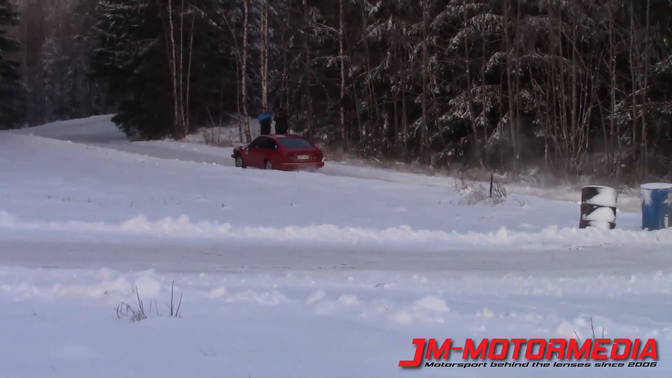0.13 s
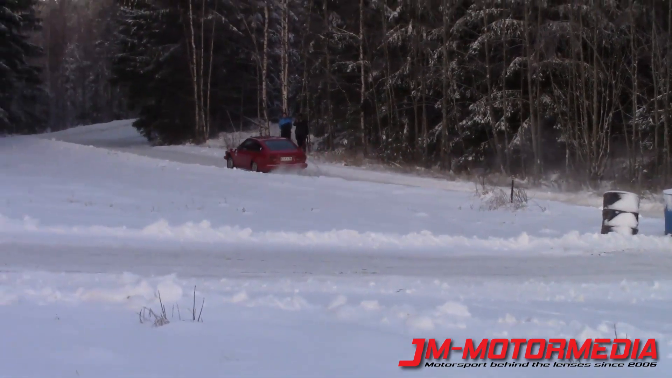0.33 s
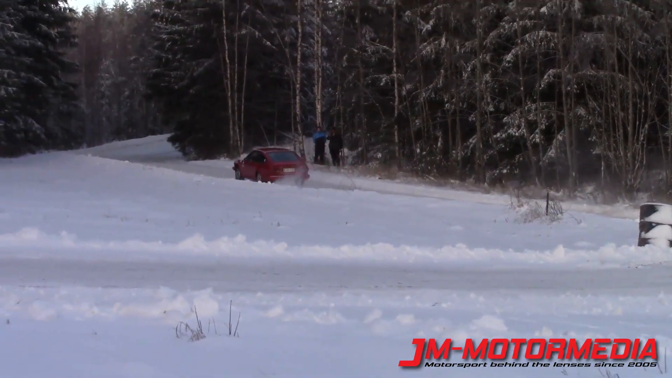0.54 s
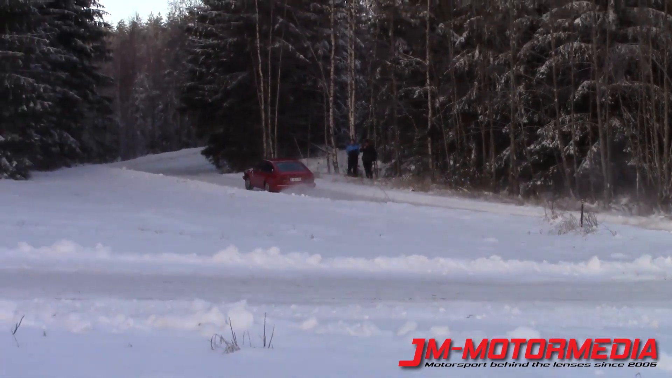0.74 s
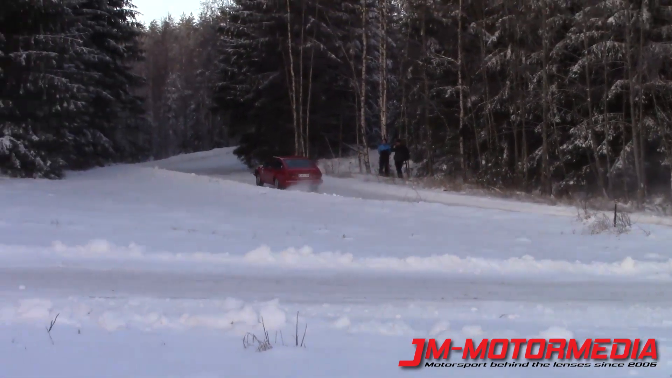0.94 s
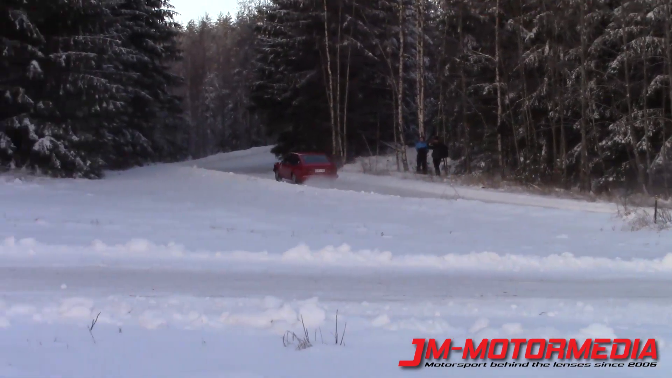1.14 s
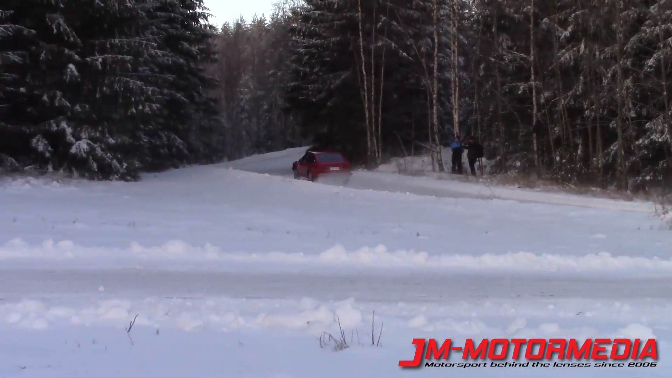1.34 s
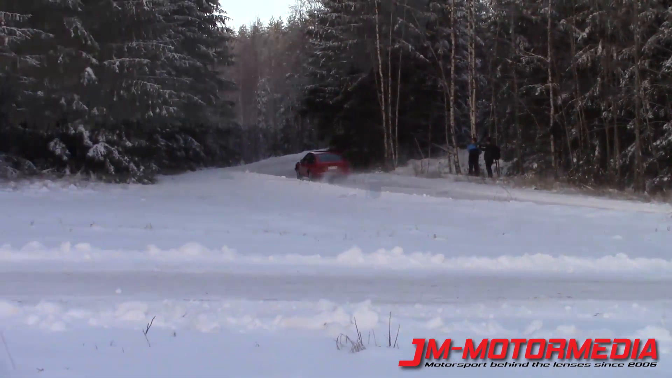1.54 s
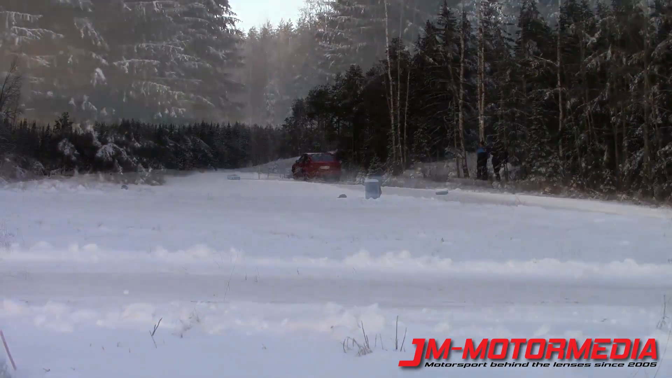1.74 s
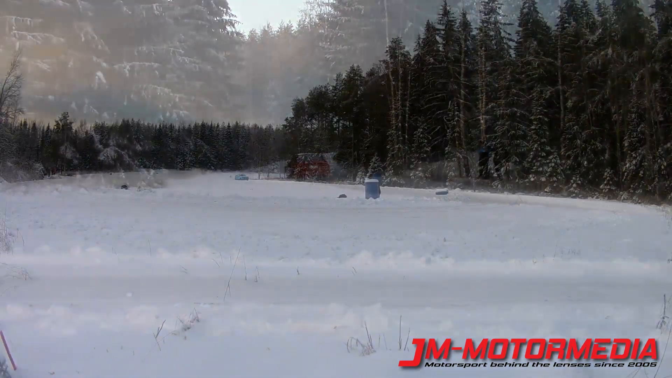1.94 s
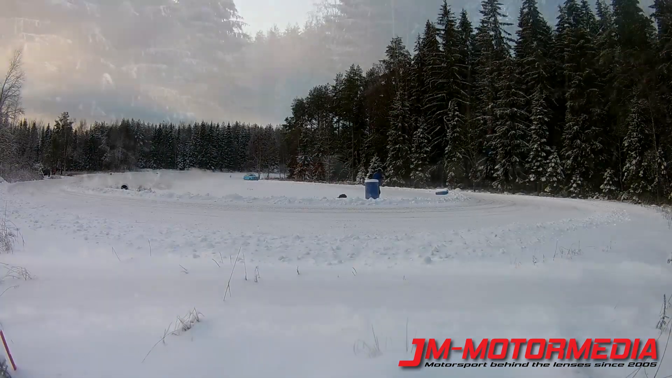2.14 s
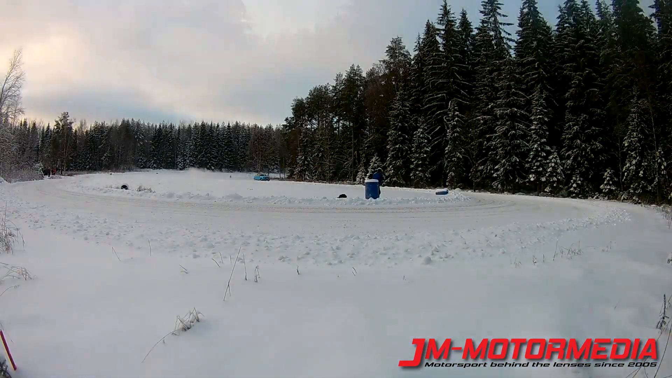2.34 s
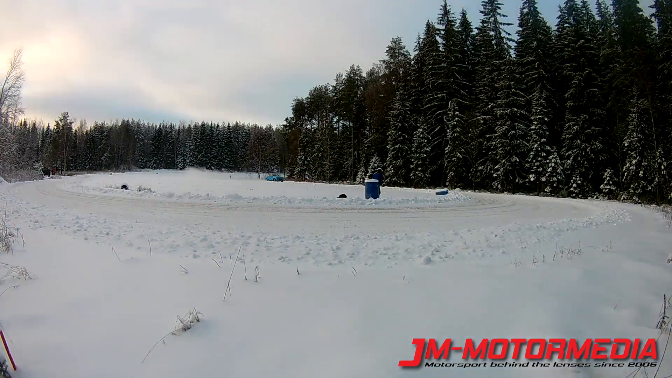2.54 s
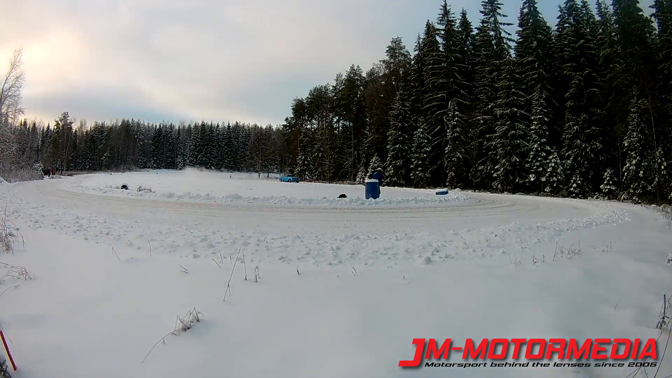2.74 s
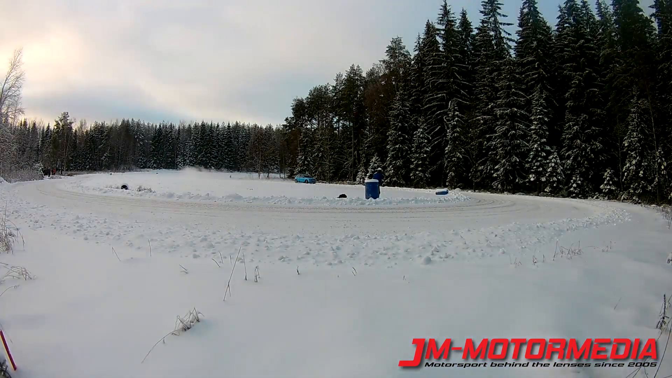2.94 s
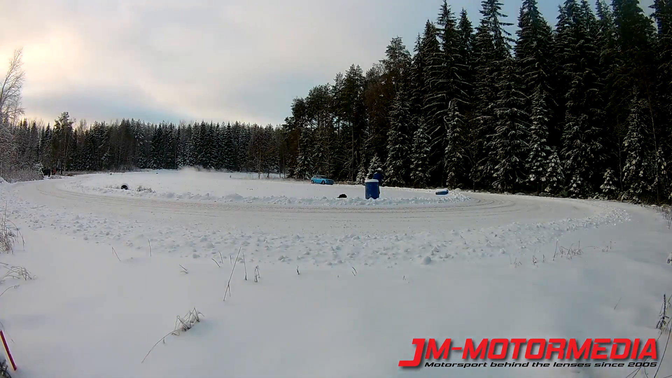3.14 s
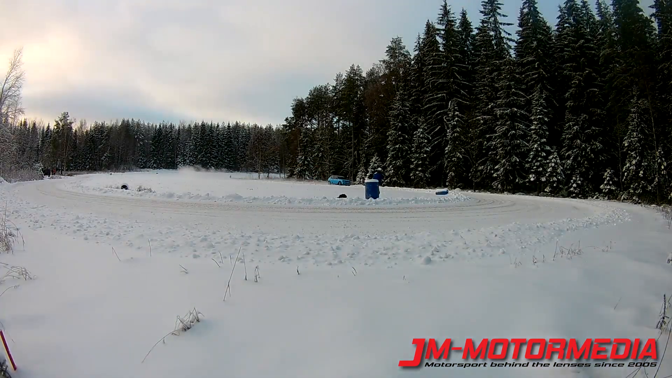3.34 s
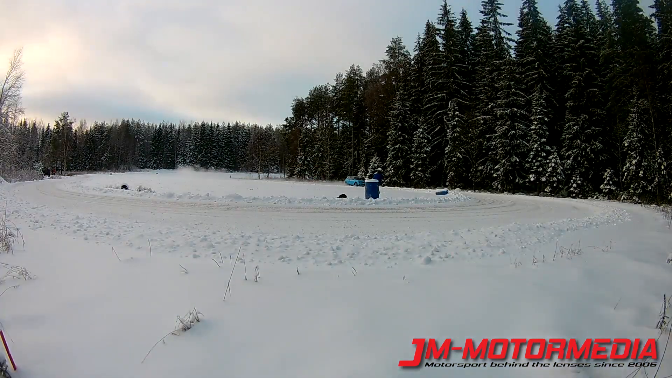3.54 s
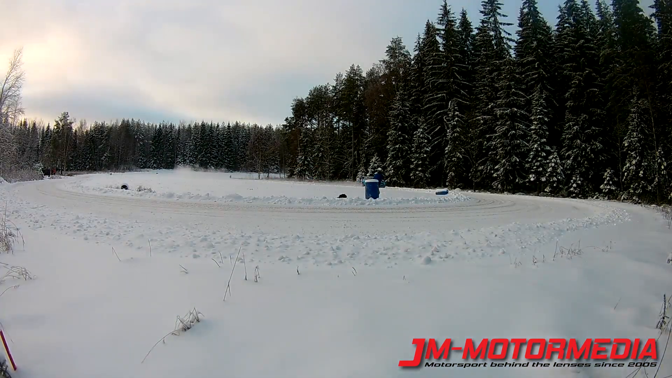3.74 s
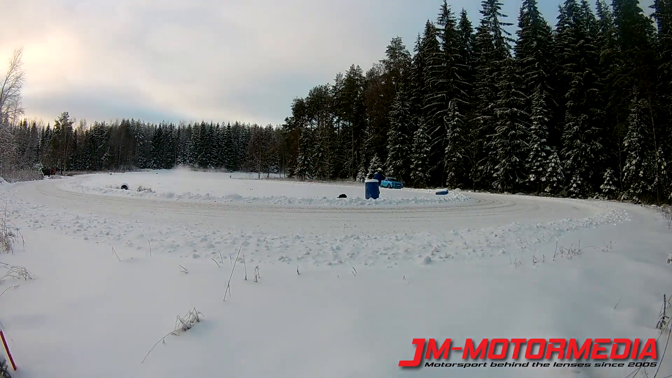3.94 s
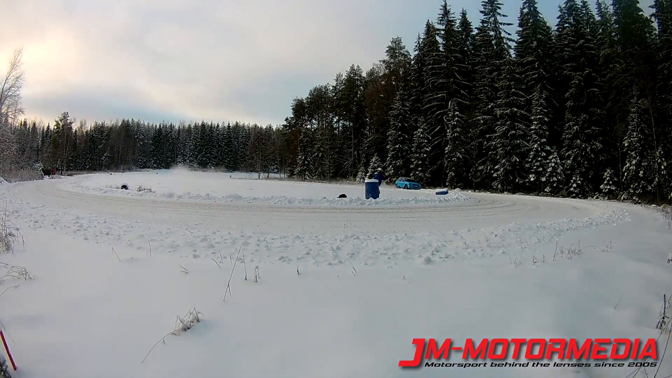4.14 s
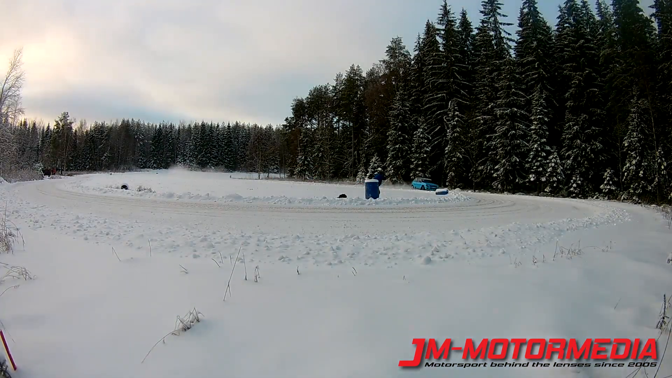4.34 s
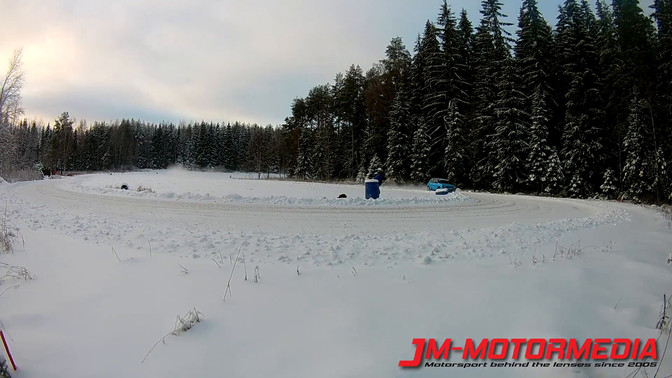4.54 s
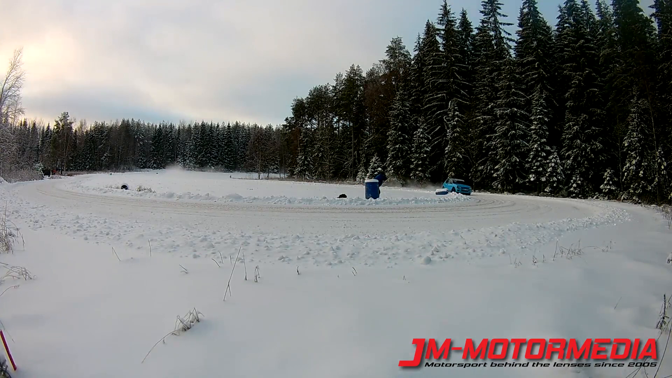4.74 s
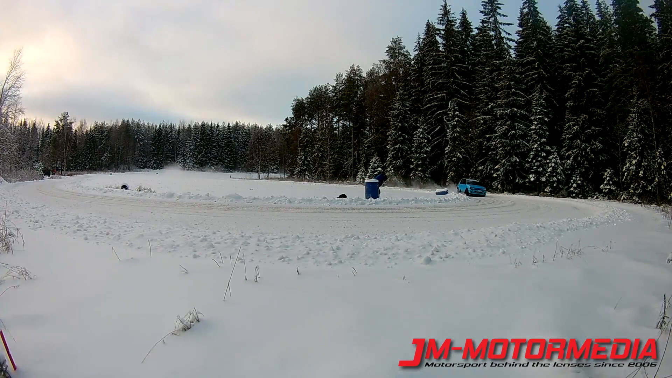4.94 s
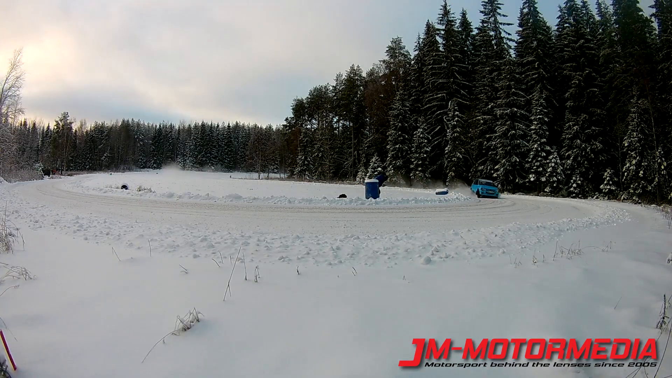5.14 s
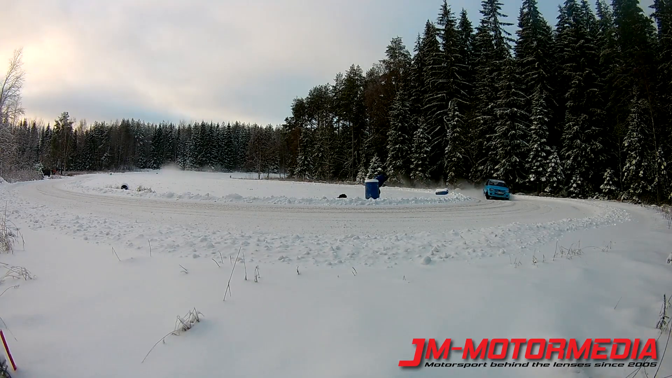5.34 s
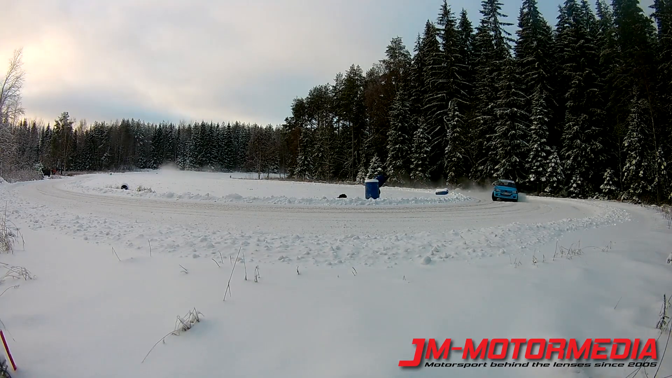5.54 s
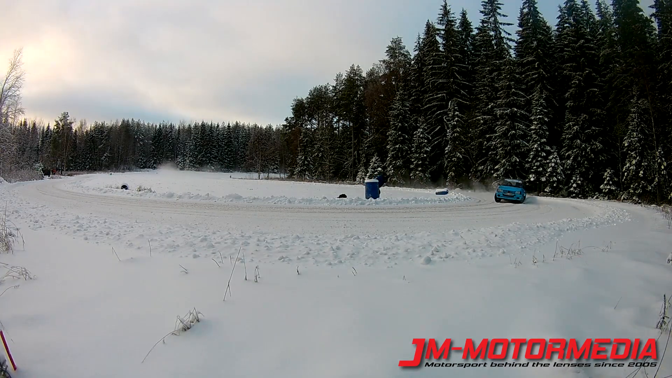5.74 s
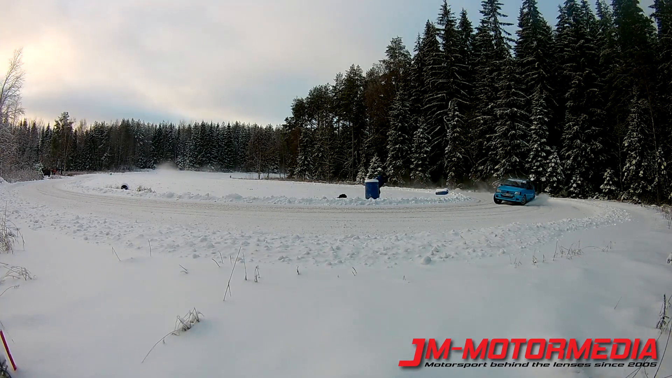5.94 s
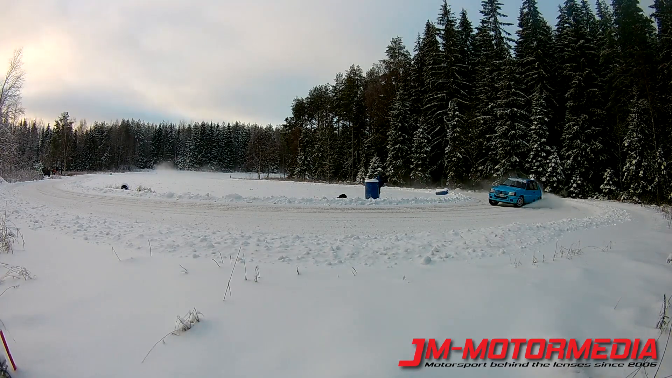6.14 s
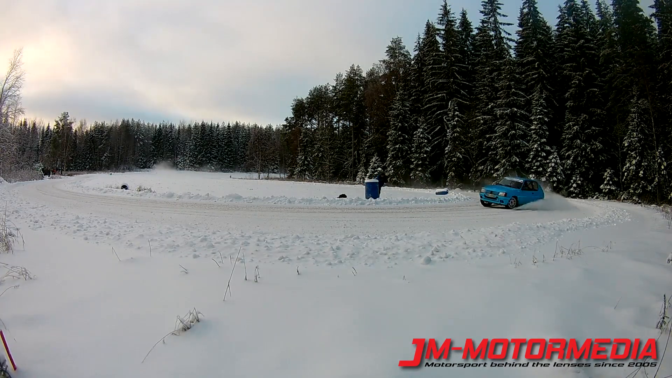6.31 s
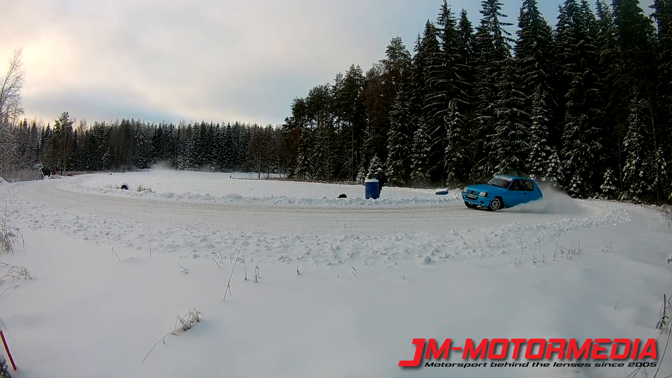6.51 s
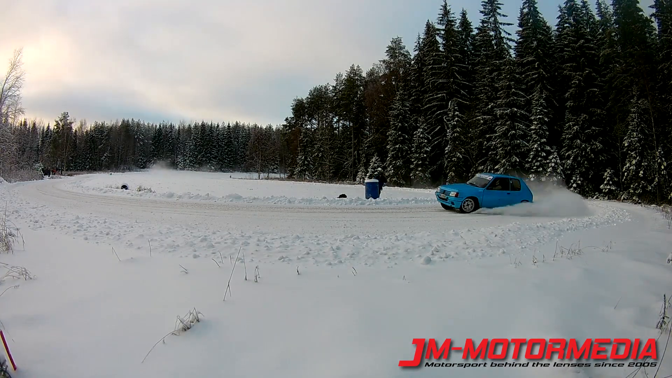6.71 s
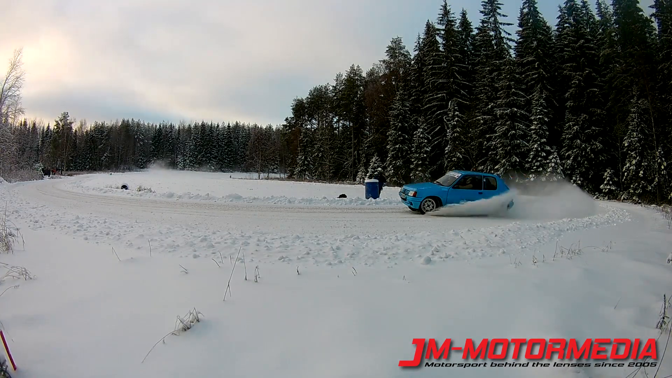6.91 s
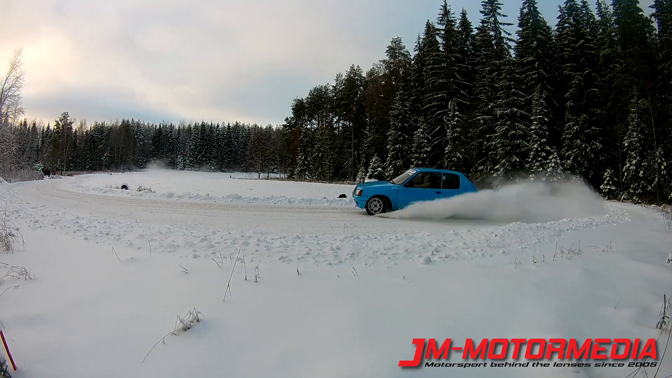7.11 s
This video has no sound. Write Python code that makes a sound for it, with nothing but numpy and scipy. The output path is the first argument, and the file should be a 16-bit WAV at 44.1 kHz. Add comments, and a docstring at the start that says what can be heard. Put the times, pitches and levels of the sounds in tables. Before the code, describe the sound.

Two rally cars outdoors in winter. The first, heard openly, drives off with full exhaust roar and rasp, its pitch rising slightly before the throttle closes. The sound switches abruptly to a dull enclosed microphone with gusty low rumble and a small far engine. That engine booms briefly, sags in pitch, picks up again and surges near, buzzing and rough, with soft hissing snow.

```python
"""Two rally cars on a snowy forest track, joined by a hard cut at about two seconds.
First, at an open microphone, a car pulls away and lifts off: engine orders under exhaust roar, rasp and hiss.
Then a boxed-in microphone hears another car from afar, over wind rumble and faint self-noise. It lifts
off for a bend, a short boom sounding just before, and charges near: its orders, uneven firings and roar
swell along with the noise of thrown snow."""
import sys
import numpy as np
from scipy import signal
from scipy.fft import rfft, irfft, next_fast_len
from scipy.io import wavfile
from scipy.ndimage import uniform_filter1d

SR = 44100
rng = np.random.default_rng(int(sys.argv[2]) if len(sys.argv) > 2 else 0)


def transcribe(u):
    """Save the signal u as a 16-bit wav file named by the first command-line argument.

    u: samples, shape (n,) or (channels, n), limited to [-1, 1]; the rate is SR.
    q: integer samples, one column per channel.
    """
    v = np.clip(np.atleast_2d(u).T, -1, 1)
    q = np.round(v * 32767).astype(np.int16)
    wavfile.write(sys.argv[1], SR, q)


N = 320607
T = np.arange(N) / SR   # time axis in s


def amp(db):
    """Turn dB into linear gain."""
    return 10 ** (np.asarray(db) / 20)


def rms_one(x):
    """Scale to rms 1."""
    return x / np.sqrt(np.mean(x ** 2) + 1e-20)


def in_time(rows):
    """Draw each column of a (t/s, value, ...) table as a curve, one value a sample."""
    times, *columns = np.transpose(rows)
    return [np.interp(T, times, column) for column in columns]


def at_hz(points, hz):
    """Read the dB of a spectrum at given frequencies, along a log frequency axis."""
    points_hz, points_db = np.array(points).T
    return np.interp(np.log(hz), np.log(points_hz), points_db)


def drift(rate):
    """Slow random modulation of rms 1: noise low-passed at about `rate` Hz."""
    step = 40   # samples between control values
    knots = rng.standard_normal(N // step + 1)
    lowpass = signal.butter(1, min(rate, 400), fs=SR / step, output="sos")
    slow = rms_one(signal.sosfiltfilt(lowpass, knots))
    return np.interp(np.arange(N) / step, np.arange(len(slow)), slow)


def colour(x, spectrum):
    """Filter by a spectrum, dark outside its ends, and scale to rms 1."""
    size = next_fast_len(N)
    hz = np.fft.rfftfreq(size, 1 / SR) + 1e-3   # the offset keeps log(0) away
    points_hz, points_db = np.array(spectrum).T
    gain_db = np.interp(np.log(hz), np.log(points_hz), points_db, left=-120, right=-120)
    return rms_one(irfft(rfft(x, size) * amp(gain_db), size)[:N])


def hiss(spectrum, patchy_db, rate):
    """Coloured noise whose level flickers at random by `patchy_db` rms."""
    flicker = amp(patchy_db * drift(rate))
    return colour(rng.standard_normal(N) * flicker, spectrum)


def burst(start, length):
    """A smooth hump of height 1, from `start` on for `length` seconds."""
    phase = np.clip((T - start) / length, 0, 1)
    return np.sin(np.pi * phase) ** 0.55


def orders(turns, multiples, levels_db, wobble_db):
    """Sines locked to the crank angle, nearly in step so that they sum to suction pulses."""
    waver_hz, phase_spread = 9, 0.35   # each order wavers in strength; start scatter in cycles
    total = np.zeros(N)
    for multiple, level_db in zip(multiples, levels_db):
        strength = np.sqrt(2) * amp(level_db + wobble_db * drift(waver_hz))   # dB is rms
        cycles = multiple * turns + phase_spread * rng.random()
        total -= strength * np.cos(2 * np.pi * cycles)
    return total


def roar(turns, spectrum, gating, patchy_db):
    """Turbulent noise that puffs with the two firings of each crank turn."""
    puffs = 1 + np.clip(gating, 0, 1) * np.cos(4 * np.pi * turns)
    flicker = amp(patchy_db * drift(17))
    return colour(rng.standard_normal(N) * puffs * flicker, spectrum)


def coming_car():
    """The approaching car: tonal engine, irregular exhaust and tyre noise share one crank angle."""
    # engine speed: t/s, crank rate/Hz
    coming_speed = [(2.05, 105), (2.2, 102.8), (2.35, 89.5), (2.5, 88.9), (2.8, 94), (3.1, 94.9), (3.3, 98),
                    (3.85, 91.5), (4.0, 93.5), (4.3, 104), (4.42, 96), (4.54, 77), (4.64, 68.8),
                    (4.8, 60.5), (4.92, 69), (5.08, 57.5), (5.17, 53.5), (5.29, 67), (5.41, 74), (5.57, 69),
                    (5.74, 77), (6.0, 82.5), (6.3, 85.8), (6.45, 86.5), (6.9, 92.2), (7.27, 93.5)]
    # mix automation: t/s, then level/dB of firing note, other whole orders, half orders,
    # uneven firing, exhaust roar, snow spray
    coming_levels = [(2.02, -57, -50.5, -59, -55, -47.5, -67), (2.3, -58, -65, -71, -55, -46, -68),
                     (2.6, -50, -47, -49.5, -56, -47, -64.5), (2.8, -62, -59, -46.5, -62, -46, -62.5),
                     (3.0, -56.5, -50, -69, -56, -49, -64), (3.45, -55.5, -68, -65, -52.5, -47, -61.5),
                     (3.85, -56.5, -65, -67, -61, -48, -63.5), (4.12, -49.5, -54, -61, -53, -45.5, -63),
                     (4.3, -56.5, -56, -61, -53, -49, -60.5), (4.46, -56, -45.5, -65, -60, -44, -60),
                     (4.58, -41, -73, -61, -53, -45.5, -60.5), (4.75, -37, -57, -49, -48, -42, -61),
                     (5.0, -34.5, -45, -45, -53, -39.5, -60), (5.2, -31.5, -42, -48, -41, -30.5, -56),
                     (5.44, -32, -30.5, -33, -42, -33.5, -54), (5.55, -30, -40, -37, -37, -32, -56),
                     (5.68, -30, -29.5, -32.5, -36.5, -33.5, -53), (5.88, -32, -31.5, -34, -35, -31, -52.5),
                     (6.1, -29.5, -26, -36, -32.5, -34.5, -52), (6.3, -27.5, -26.5, -33, -38, -31.5, -51.5),
                     (6.55, -25, -26, -30.5, -34, -32.5, -48), (6.76, -32, -25, -24, -30.5, -26, -47.5),
                     (6.88, -28.5, -21, -26, -31, -28.5, -46.5), (7.0, -16.5, -20, -31.5, -34, -32, -47.5),
                     (7.27, -17.5, -19, -31, -27, -31.5, -47.5)]
    # exhaust roar spectrum: f/Hz, level/dB
    roar_spectrum = [(65, -26), (110, -11.5), (156, -16.5), (189, -16), (252, -14), (308, -10), (340, -15),
                     (404, -7), (436, -3.5), (504, -6), (588, -10), (635, -13), (1100, -45.5),
                     (1430, -72.5), (2420, -120)]
    speed = uniform_filter1d(in_time(coming_speed)[0], size=2500)   # the flywheel rounds the corners
    turns = np.cumsum(speed) / SR
    firing_db, whole_db, half_db, uneven_db, roar_db, spray_db = in_time(coming_levels)
    engine = coming_orders(turns, speed, firing_db, whole_db, half_db)
    exhaust = amp(roar_db) * roar(turns, roar_spectrum, 0.34, 0.25)
    exhaust += amp(uneven_db) * uneven_firing(turns)
    return engine + exhaust + exhaust_booms() + snow_spray(turns, spray_db)


def coming_orders(turns, speed, firing_db, whole_db, half_db):
    """Firing note at order 2, plus whole and half orders coloured by exhaust and box."""
    # how exhaust and box pass a tone: f/Hz, level/dB
    note_colour = [(50, -14.5), (72, -9), (85, -11.5), (93, -2.5), (110, 1.5), (190, -3.7), (230, -0.5),
                   (270, 1), (330, -3.2), (390, -3.5), (430, 3), (465, 4), (490, -12.5), (520, -1.5),
                   (555, -4), (610, -12.5), (750, -27.5)]
    # strength of each whole order: level/dB
    whole_strengths = [-1.5, -19.5, 2.03, -12, -8.5, -11, -7.5]
    # strength of each half order: level/dB
    half_strengths = [-11, -5, -10.5, 1.5, -11.5]
    far_waver_db, near_waver_db, near_from_s = 2.5, 0.2, 5.8   # more waver over the long path
    firing_waver_db = np.where(T < near_from_s, far_waver_db, near_waver_db)
    engine = orders(turns, [2], [firing_db], firing_waver_db)
    families = [([1, 3, 4, 5, 6, 7, 8], whole_db, whole_strengths),
                ([2.5, 3.5, 4.5, 5.5, 7.5], half_db, half_strengths)]
    for multiples, family_db, strengths in families:
        levels_db = [family_db + strength_db + at_hz(note_colour, multiple * speed)
                     for multiple, strength_db in zip(multiples, strengths)]
        engine += orders(turns, multiples, levels_db, 0.96)
    return engine


def uneven_firing(turns):
    """Two firings a turn, each by chance stronger or weaker than the mean: the excess rings the pipe."""
    # pipe resonances: f/Hz, level/dB
    pipe_spectrum = [(120, -31), (210, -6), (227, -20.5), (269, -9), (313, -2.5), (354, -1), (373, -5),
                     (398, -0.5), (538, -15), (676, -18.5), (1000, -33), (1300, -71), (2200, -120)]
    firing_count = np.floor(2 * turns).astype(int)
    at = np.flatnonzero(np.diff(firing_count)) + 1
    excess = np.zeros(N)
    excess[at] = rng.standard_normal(len(at))
    return colour(excess, pipe_spectrum)


def exhaust_booms():
    """Short low sine bursts from the exhaust."""
    # booms: t/s, peak level/dB, f/Hz, length/s
    boom_events = [(4.086, -28.5, 95, .056), (3.96, -40, 135, .06)]
    booms = np.zeros(N)
    for start, peak_db, hz, length in boom_events:
        booms += amp(peak_db) * burst(start, length) * np.sin(2 * np.pi * hz * (T - start))
    return booms


def snow_spray(turns, spray_db):
    """Thrown snow: a coarse noise band, and a fine bright one that swells for tyre crunches."""
    # coarse spray spectrum: f/Hz, level/dB
    coarse_spectrum = [(530, -15.5), (900, -7), (1050, -13.5), (1430, -3), (1610, -1.5), (1790, -7),
                       (1990, -6), (2250, -10.5), (2710, -26), (2900, -38), (3770, -45.5), (6380, -120)]
    # fine spray spectrum: f/Hz, level/dB
    fine_spectrum = [(1590, -43.5), (2700, -15), (2900, -6), (3200, -9.5), (3480, -3.5), (4000, 1),
                     (4450, -13), (5380, -11), (6060, -14.5), (7030, -33), (7500, -27), (8200, -46),
                     (9640, -24.5), (10500, -39), (12200, -40.5), (14500, -42.5)]
    # crunches of tyres in crusted snow: t/s, level/dB, length/s
    crunch_events = [(3.675, -70, 0.048), (3.738, -75, 0.027), (3.796, -72, 0.045), (3.847, -74, .03),
                     (4.13, -74, 0.11), (4.218, -73, 0.18)]
    # fine spray is -62.5 dB at a coarse spray of -50 dB and grows faster as the car nears
    fine_gain = amp(-62.5 + 1.42 * (spray_db + 50))
    for start, level_db, length in crunch_events:
        fine_gain += amp(level_db) * burst(start, length)
    coarse = amp(spray_db) * roar(turns, coarse_spectrum, 0.062, 0.59)
    return coarse + fine_gain * hiss(fine_spectrum, 0.6, 40)


def leaving_car():
    """The car pulling away: crank-locked orders under three bands of puffing noise."""
    # engine speed: t/s, crank rate/Hz
    leaving_speed = [(0, 72.5), (.17, 76.8), (.3, 80.3), (.6, 83.8), (.95, 85), (1.5, 86.7), (1.63, 80),
                     (2.01, 75.5)]
    # mix automation: t/s, exhaust roar level/dB, hiss level/dB
    leaving_levels = [(0, -31, -46.5), (.17, -30, -48.5), (.3, -32, -49), (.6, -30.5, -49.5),
                      (.95, -29, -47), (1.2, -29, -49), (1.5, -32, -50), (1.63, -34, -55.5),
                      (1.75, -33, -54.5), (2.01, -35.5, -58)]
    # one row an order: steady level/dB, extra level at the launch/dB, loss off throttle/dB
    order_levels = [(-43.5, 4, 7.5), (-43, 10.5, 2.5), (-44, -2, 13.5), (-43, 6.5, 12.5), (-47.5, 1, 10),
                    (-44.5, 4, 4), (-40.5, -6.5, 26), (-43.5, 1, 22)]
    # exhaust roar spectrum: f/Hz, level/dB
    roar_spectrum = [(29, -41), (50, -17), (76, -15), (114, -11.5), (172, -11), (201, -16), (250, -7.5),
                     (289, -8.5), (344, -4.5), (386, -12), (494, -2.5), (753, 2), (1600, -4.5), (2080, -9),
                     (3520, -120)]
    # rasp spectrum: f/Hz, level/dB
    rasp_spectrum = [(820, 3), (1400, -13.5), (2160, -1), (2470, -7.5), (2950, -5.5), (3380, -14.5),
                     (3800, -22), (4940, -24), (8360, -120)]
    # hiss spectrum: f/Hz, level/dB
    hiss_spectrum = [(2060, -22.5), (3500, 0), (4020, 3.5), (4410, -7.5), (4840, -3), (5280, -8.5),
                     (5730, -5.5), (8490, -7.5), (14200, -26), (15600, -30)]
    launch_s = 0.24                    # the launch boom dies away over this time
    lift_s, lift_takes_s = 1.454, 0.17   # the throttle closes
    speed = uniform_filter1d(in_time(leaving_speed)[0], size=4000)   # the flywheel rounds the corners
    turns = np.cumsum(speed) / SR
    roar_db, hiss_db = in_time(leaving_levels)
    launch = np.exp(-(T / launch_s) ** 2)
    lifted = np.clip((T - lift_s) / lift_takes_s, 0, 1)
    order_db = [steady_db + extra_db * launch - loss_db * lifted
                for steady_db, extra_db, loss_db in order_levels]
    engine = orders(turns, [1, 2, 3, 4, 6, 8, 9, 12], order_db, 1.3)
    exhaust = roar(turns, roar_spectrum, 0.1, 1.0)
    exhaust += amp(-6) * roar(turns, rasp_spectrum, 0.089, 0.59)   # rasp 6 dB under the roar
    bright = amp(hiss_db) * roar(turns, hiss_spectrum, 0.1, 1.1)
    return engine + amp(roar_db) * exhaust + bright


def wind_on_box():
    """Wind rumbling on the box: low noise with gusts drawn by hand and a random flicker."""
    # gusts: t/s, level/dB
    gusts = [(2.02, -51), (2.33, -51), (2.6, -50.5), (2.93, -45.5), (3.22, -45.5), (3.75, -38.5),
             (3.96, -44.5), (4.28, -39.5), (4.55, -44), (4.93, -44.5), (5.7, -49), (6.08, -37.5),
             (6.25, -44), (6.93, -36), (7.25, -41)]
    # rumble spectrum: f/Hz, level/dB
    rumble_spectrum = [(15, -34), (25, -16.5), (38, 0), (52, 1), (70, -3), (95, 2.5), (120, -16),
                       (150, -17.5), (200, -43)]
    return amp(in_time(gusts)[0]) * hiss(rumble_spectrum, 3.0, 11)


def self_noise():
    """Faint bright noise floor with a slight flicker."""
    # noise floor spectrum: f/Hz, level/dB
    floor_spectrum = [(1470, -26), (2500, -5), (3070, -9.5), (3450, 0), (3720, -7), (4050, -7),
                      (4210, -9.5), (4510, -9), (5540, -9.5), (6710, -15.5), (9910, -16.5), (15100, -15.5),
                      (15600, -7.5)]
    return amp(-75) * hiss(floor_spectrum, 0.6, 30)


def scene():
    """A hard cut switches from the open microphone to the boxed-in one."""
    cut_s = 2.009
    boxed = coming_car() + wind_on_box() + self_noise()
    return np.where(T < cut_s, leaving_car(), boxed)[None]


def record(dry):
    """A steep elliptic low-pass at 15680 Hz cuts the top."""
    lowpass = signal.ellip(14, 0.5, 70, 15680, fs=SR, output="sos")
    return signal.sosfilt(lowpass, dry)


dry = scene()
out = record(dry)
transcribe(out)
```